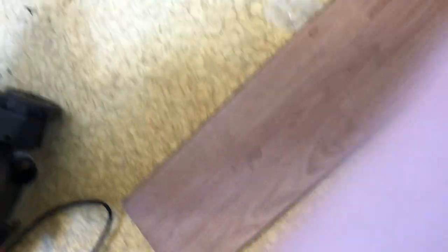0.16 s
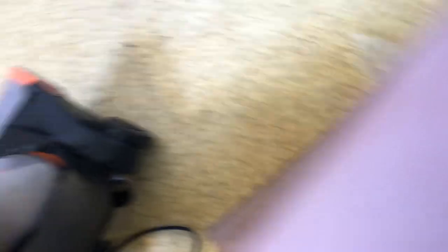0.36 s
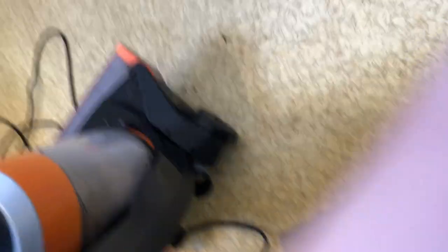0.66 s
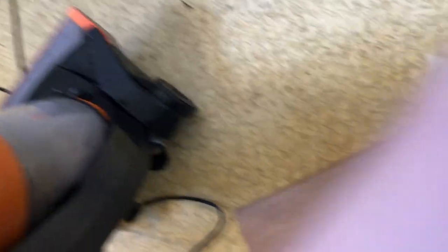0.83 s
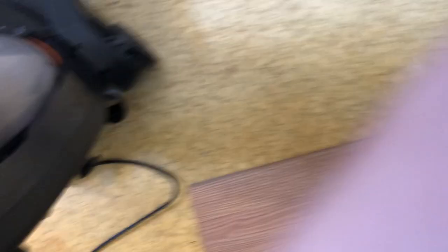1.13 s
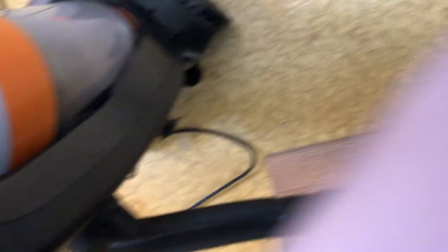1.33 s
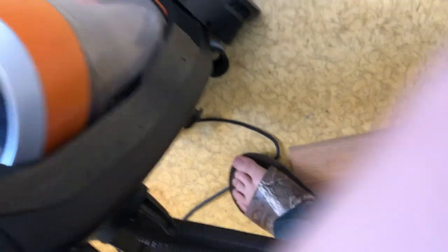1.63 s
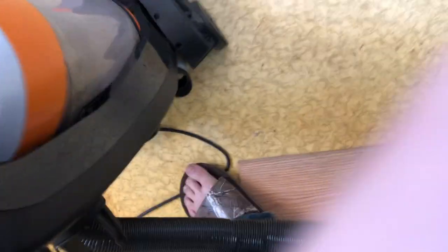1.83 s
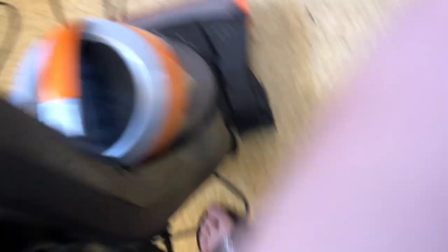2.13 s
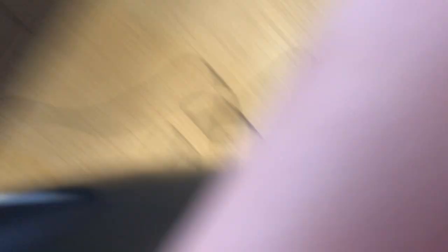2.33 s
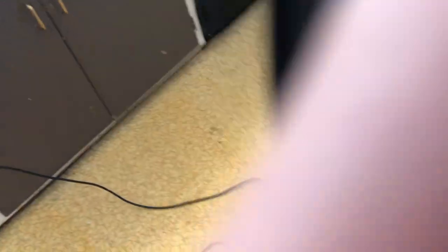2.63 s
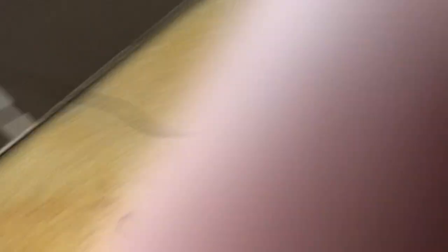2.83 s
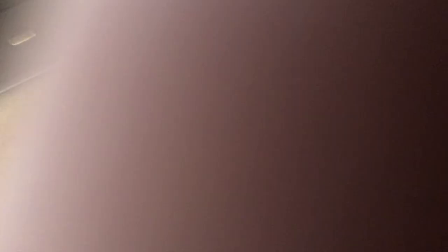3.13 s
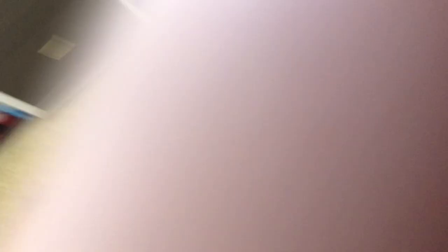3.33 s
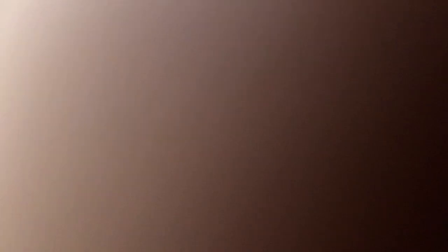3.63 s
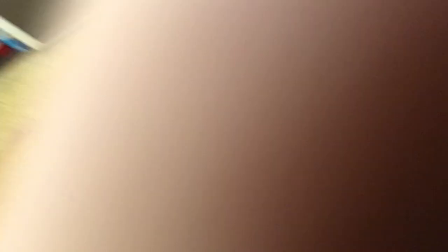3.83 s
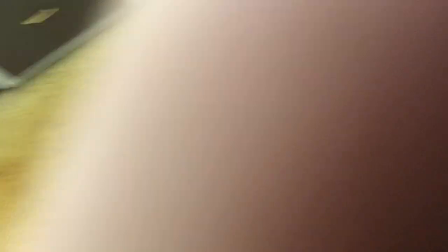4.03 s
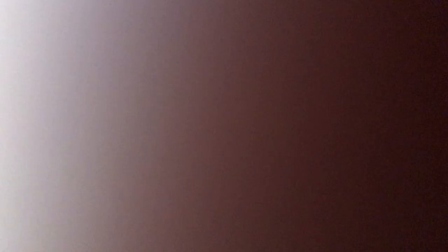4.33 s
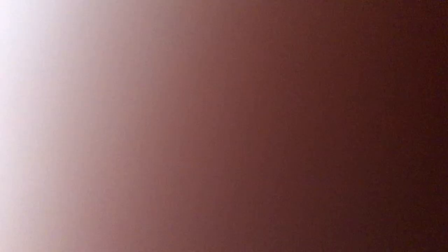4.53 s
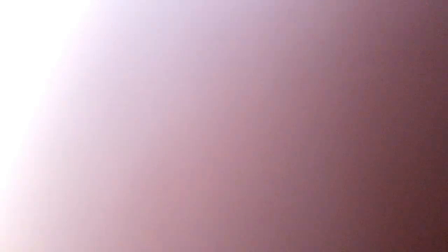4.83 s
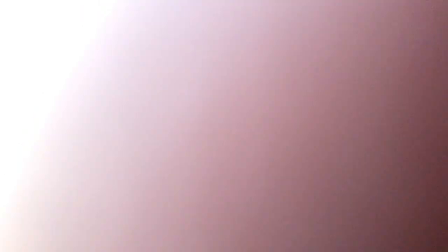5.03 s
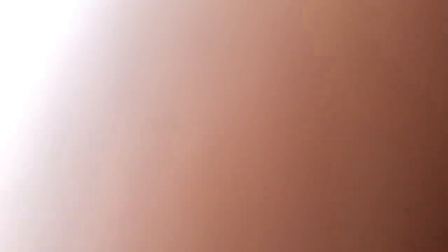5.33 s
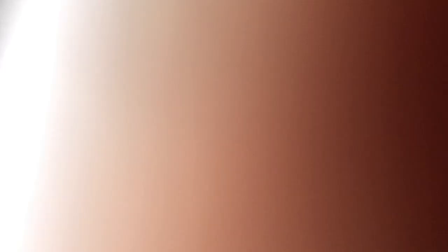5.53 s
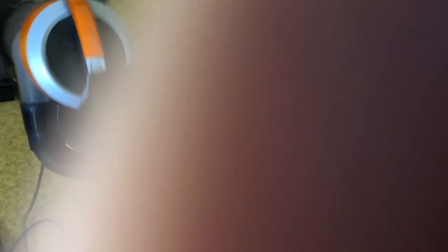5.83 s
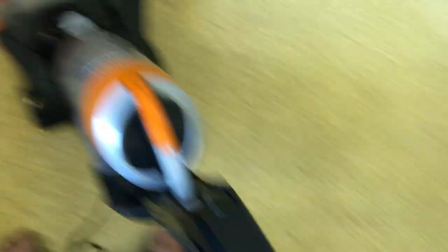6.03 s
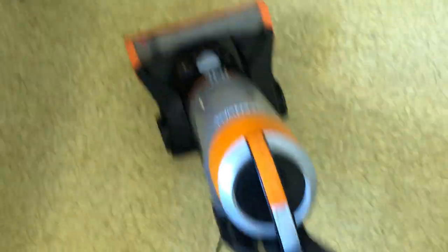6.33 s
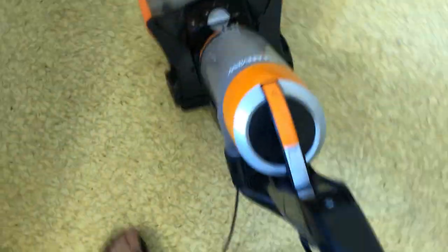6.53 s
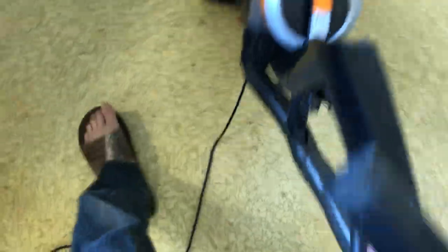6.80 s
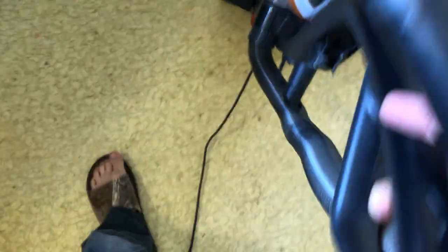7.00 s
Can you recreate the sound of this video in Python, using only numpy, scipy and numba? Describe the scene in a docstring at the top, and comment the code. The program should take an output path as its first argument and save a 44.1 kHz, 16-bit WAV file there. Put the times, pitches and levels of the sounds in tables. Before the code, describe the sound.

An upright vacuum cleaner runs over carpet with a steady motor hum, high whine and rushing air, turning hissier midway.

```python
"""An upright vacuum cleaner is pushed over carpet, heard from a phone carried by the person steering it.
From the start air roars through the body, the motor shaft hums, its fan whines
and the brush roll beats against the mains hum. Grit ticks inside near 1 s and 2 s; a short rumble passes.
Midway the phone swings round and a sharper air hiss comes forward, peaking near 5.8 s and then fading."""
import sys
import numpy as np
from scipy import signal
from scipy.fft import rfft, irfft, next_fast_len
from scipy.io import wavfile
from scipy.ndimage import uniform_filter1d
from numba import njit

SR = 44100
rng = np.random.default_rng(int(sys.argv[2]) if len(sys.argv) > 2 else 0)


def dump_mix(stems):
    """Bounce the given channels to the path in sys.argv[1] as a 16-bit WAV at rate SR."""
    frames = np.atleast_2d(stems).T  # one column per channel
    limited = np.clip(frames, -1, 1)  # hard clip at full scale
    pcm = np.round(limited * 32767).astype(np.int16)
    wavfile.write(sys.argv[1], SR, pcm)


N = 315756
TIME = np.arange(N) / SR
MAINS_HZ, TOP_HZ = 60, 15750


def undb(db):
    return 10 ** (np.asarray(db) / 20)


def unit(x):
    """Scale to rms 1."""
    return x / np.sqrt(np.mean(x ** 2))


def curves(table):
    """Table columns, interpolated linearly in time."""
    time_s, *columns = np.transpose(table)
    return [np.interp(TIME, time_s, column) for column in columns]


def drift(rate_hz):
    """Smooth random drift, spread near 1."""
    hold = max(int(SR / rate_hz), 2)
    steps = np.repeat(rng.standard_normal(N // hold + 2), hold)
    steps = steps[rng.integers(hold):][:N]
    return 1.47 * uniform_filter1d(uniform_filter1d(steps, hold), hold)


@njit
def bandpass(x, centre_hz, width_hz):
    """State-variable band-pass, unity gain at its moving centre."""
    y, band, low = np.empty(len(x)), 0., 0.
    for i in range(len(x)):
        g, damping = np.tan(np.pi * centre_hz[i] / SR), width_hz / centre_hz[i]
        v = (band + g * (x[i] - low)) / (1 + g * (g + damping))
        band, low, y[i] = 2 * v - band, low + 2 * g * v, damping * v
    return y


def resonate(x, centre_hz, width_hz):
    """Steep-skirted resonance, equally wide at any centre."""
    centre_hz = np.minimum(centre_hz * np.ones(N), .44 * SR)
    angle = 2 * np.pi * centre_hz.mean() / SR
    warped_hz = float(width_hz * angle / np.sin(angle))
    return bandpass(bandpass(x, centre_hz, warped_hz), centre_hz, warped_hz)


def noise_band(centre_hz, width_hz):
    return resonate(rng.standard_normal(N), centre_hz, width_hz)


def turbulence(colour, flicker_db, flicker_hz, ripple_db=1.1):
    """Coloured air noise, rippled by room reflections; each octave flickers on its own."""
    size = next_fast_len(N)
    bin_hz = np.maximum(np.fft.rfftfreq(size, 1 / SR), 1)
    freq_hz, density_db = np.transpose(colour)
    colour_db = np.interp(np.log(bin_hz), np.log(freq_hz), density_db)
    knots_hz = np.arange(0, SR / 2, 20)
    room_db = ripple_db * np.interp(bin_hz, knots_hz, rng.standard_normal(len(knots_hz)))
    spectrum = rfft(rng.standard_normal(size)) * undb(colour_db + room_db)
    octave = np.clip(np.log2(bin_hz / 60), 0, 8)
    bands = (irfft(spectrum * np.maximum(1 - abs(octave - k), 0), size)[:N] for k in range(9))
    return unit(sum(band * undb(flicker_db * drift(flicker_hz)) for band in bands))


def tone(cycles, scatter, fade_hz):
    """Sine of rms 1; its reflections add and cancel as the machine moves."""
    paths = 1 + scatter * (drift(fade_hz) + 1j * drift(fade_hz))
    return unit(np.imag(paths * np.exp(2j * np.pi * cycles)))


# Grit impacts: start_s, level_db, centre_hz, width_hz, t60_s
GRIT_HITS = [(1.156, -26, 14300, 3500, .013), (2.252, -16, 4200, 5000, .016),
             (2.252, -24, 12000, 6000, .007), (2.255, -26, 10800, 2500, .01)]

def grit(dust_per_s=150):
    """Hard crumbs click in the plastic duct over a faint patter of dust."""
    clicks = 0
    for start_s, level_db, centre_hz, width_hz, t60_s in GRIT_HITS:
        decay = (TIME >= start_s) * undb(-60 * np.maximum(TIME - start_s, 0) / t60_s)
        clicks += undb(level_db) * decay * unit(noise_band(centre_hz, width_hz))
    dust = (rng.random(N) < dust_per_s / SR) * rng.standard_normal(N)
    return clicks + undb(-57) * unit(resonate(dust, centre_hz=4000, width_hz=7000))


# Air surges: peak_s, level_db, centre_hz, width_hz, half_length_s
AIR_SURGES = [(2.15, -42, 240, 200, 1), (3.6, -38, 10000, 5000, 0.08), (3.56, -27.5, 5800, 1100, 0.07),
              (4.012, -31, 4300, 1400, 0.11), (4.16, -44, 12000, 2500, .04), (4.38, -42, 13400, 2400, .16),
              (4.557, -35.5, 4600, 550, .12), (5.0, -37, 4720, 400, .25), (2.28, -37, 5000, 6000, .035),
              (5.9, -42, 9000, 6000, .04), (5.83, -36, 8000, 2500, 0.098), (5.743, -21.5, 640, 740, 0.026),
              (5.74, -26, 3600, 3000, .02), (5.762, -31.5, 195, 170, 0.056),
              (5.86, -24.5, 5350, 1300, 0.087), (6.546, -33, 630, 180, 0.1)]

def surges():
    """Swells of rushing air and rumble, each in its own band."""
    sound = 0
    for peak_s, level_db, centre_hz, width_hz, half_length_s in AIR_SURGES:
        swell = np.exp(-((TIME - peak_s) / half_length_s) ** 2)
        sound += undb(level_db) * swell * unit(noise_band(centre_hz, width_hz))
    return sound


# Brush contact with the carpet: time_s, level_db
BRUSH_CONTACT = [(0, -32.5), (.32, -30.5), (.95, -35), (1.2, -42), (1.5, -40), (1.62, -53), (2.27, -49),
                 (2.41, -37), (2.56, -42), (3.0, -44), (3.52, -37), (3.9, -46.5), (4.6, -39), (6.22, -44),
                 (6.38, -37.5), (7.16, -38.5)]
# Brush overtones: beat_multiple, level_db
BRUSH_OVERTONES = [(2, -51), (3, -47.5)]

def brush_roll(turns, beats_per_turn=.229):
    """Bristle rows slap the carpet a little slower than the mains buzz, so the two throb."""
    beats = beats_per_turn * turns
    slap = tone(beats, scatter=.21, fade_hz=11)
    buzz = tone(2 * MAINS_HZ * TIME, scatter=.088, fade_hz=2.77)
    contact = undb(curves(BRUSH_CONTACT)[0] - 3.5)  # pressed down, the nozzle radiates both more
    overtones = sum(undb(level_db) * tone(multiple * beats, scatter=.7, fade_hz=8)
                    for multiple, level_db in BRUSH_OVERTONES)
    return contact * (slap + .4 * buzz) + undb(-58) * buzz + overtones


# Air jet: time_s, level_db, shift_octaves
JET_PATH = [(2.8, -45, -.1), (3.0, -35.5, -.12), (3.36, -34.5, 0), (3.47, -26, 0.00012), (3.7, -29.5, .13),
            (3.85, -28.5, .1), (4.0, -30, -.08), (4.2, -33.5, -0.072), (4.5, -29.5, .02),
            (5.55, -27.5, -0.016), (5.79, -21, -0.073), (5.91, -22, 0.012), (6.1, -36, -0.27),
            (6.25, -60, -.2)]
# Jet resonances: centre_hz, width_hz, gain_db
JET_MODES = [(3520, 560, -3.5), (4590, 750, -2), (5760, 1300, -1), (6980, 1400, -3.5), (8700, 1200, -18)]

def jet_hiss():
    """An air jet; its resonances slide as its angle to the microphone changes."""
    level_db, shift_octaves = curves(JET_PATH)
    jet = sum(undb(gain_db) * noise_band(centre_hz * 2 ** shift_octaves, width_hz)
              for centre_hz, width_hz, gain_db in JET_MODES)
    flutter_db = .6 * drift(rate_hz=60)
    return unit(jet) * undb(level_db + flutter_db)


# Airflow, relative levels: time_s, body_db, duct_db, exhaust_db
AIR_LEVELS = [(0, -35.5, -34, -44), (.7, -36.5, -34.5, -45), (1.8, -36, -35, -45.5),
              (2.05, -37.5, -37, -44.5), (2.8, -34.5, -34, -47), (3.2, -36, -38.5, -48.5),
              (3.6, -32.5, -35, -47), (3.9, -33, -36, -46), (4.25, -31.5, -36, -42.5),
              (4.7, -28.5, -32.5, -43), (5.5, -30.5, -32, -43), (5.76, -27.5, -30.5, -42.5),
              (6.03, -32, -38, -42), (6.27, -33, -30.5, -45), (6.48, -30, -36, -42.5),
              (7.16, -33.5, -34.5, -41)]
# Air spectra: freq_hz, density_db
BODY_COLOUR = [(25, -43), (70, -28.5), (130, -14), (175, -6.5), (250, -9.5), (340, -4.5), (450, -1.5),
               (550, 0), (630, 3), (800, -3), (1100, -9), (2500, -43)]
DUCT_COLOUR = [(300, -30.5), (700, -10), (1000, 0.5), (1300, -1), (1850, -4.5), (2600, -9), (6000, -41)]
EXHAUST_COLOUR = [(500, -21), (1500, -4), (2100, 6.5), (2700, 9.5), (3500, 14), (4800, 14.5), (6000, 11),
                  (7500, 7), (9000, 3), (11000, -1), (13000, -2), (15700, -3)]

def airflow():
    """Air roars in the body, blows through the duct and rushes from the exhaust."""
    body_db, duct_db, exhaust_db = curves(AIR_LEVELS)
    body = undb(body_db + 2.5) * turbulence(BODY_COLOUR, flicker_db=.45, flicker_hz=18)
    duct = undb(duct_db + 1.5) * turbulence(DUCT_COLOUR, flicker_db=.9, flicker_hz=22)
    exhaust = undb(exhaust_db + 14) * turbulence(EXHAUST_COLOUR, flicker_db=1, flicker_hz=18)
    return body + duct + exhaust


# Reflection off the arm: time_s, gain, delay_ms
ARM_ECHO = [(2.7, 0, .45), (3.55, .28, .5), (3.8, .25, .53), (4.3, .38, .64), (5.4, .34, .625),
            (6.1, 0, .62)]

def arm_reflection(air, cutoff_hz=4300):
    """A dull echo off the arm by the microphone cuts a notch that slides as the gap changes."""
    gain, delay_ms = curves(ARM_ECHO)
    dull = signal.sosfilt(signal.butter(2, cutoff_hz, fs=SR, output="sos"), air)
    return air + gain * np.interp(TIME - delay_ms / 1000, TIME, dull)


# Whine as the fan turns to and from the microphone: time_s, low_tone_db, high_tone_db
WHINE_LEVELS = [(0, -46, -38.5), (.4, -38, -35.5), (.72, -41, -36), (.97, -43, -31.5), (1.15, -48, -39),
                (1.42, -47, -35), (1.7, -44, -38.5), (2.25, -45, -38), (2.55, -41, -39),
                (3.35, -41.5, -35.5), (3.75, -44, -41.5), (4.6, -42, -43), (5.4, -39, -40), (6.0, -50, -45),
                (6.22, -39, -38), (6.6, -38, -36.5), (6.97, -40, -36), (7.16, -46, -40)]

def fan_whine(turns, swell_db=2, crest_s=.92, period_s=.478):
    """Two fluttering blade tones; the upper crests as the machine crosses standing waves."""
    low_db, high_db = curves(WHINE_LEVELS)
    swell = np.cos(2 * np.pi * (TIME - crest_s) / period_s)
    high = undb(high_db + swell_db * swell) * tone(9 * turns, scatter=.6, fade_hz=16)
    low = undb(low_db) * tone(7 * turns, scatter=.6, fade_hz=16)
    return high + low


# Shaft hum through the room's standing waves: time_s, level_db
HUM_LEVEL = [(0, -38), (.27, -30.5), (.53, -21), (.78, -17), (1.3, -16.5), (2.25, -14), (2.4, -16),
             (2.57, -24.5), (3.1, -20.5), (3.9, -22), (4.35, -20.5), (5.14, -24.5), (5.33, -18.5),
             (5.62, -14.8), (6.6, -21.7), (6.98, -17.5), (7.16, -22.5)]
# Weak motor partials: shaft_multiple, level_db
MOTOR_PARTIALS = [(.876, -44.5), (1.228, -43.5), (1.765, -49), (2.245, -44.5), (2.6, -48), (3, -45),
                  (12, -53), (18, -58), (24, -64)]
# Lesser tones at the microphone: time_s, partials_gain_db, octave_db, mains_db
LESSER_TONES = [(0, 2, -50, -53), (1.8, 3, -49, -58), (2.6, -0.5, -43.5, -61), (4.2, -1.5, -44.5, -70),
                (5.0, -2.5, -43, -65), (6.2, -1, -41, -64), (6.9, 1, -43, -63)]

def motor(turns):
    """The unbalanced shaft hums and its fan whines; weak partials waver over mains hum."""
    partials_gain_db, octave_db, mains_db = curves(LESSER_TONES)
    hum = undb(curves(HUM_LEVEL)[0]) * tone(turns, scatter=.0226, fade_hz=26)
    room_echo = undb(-40.5) * drift(rate_hz=12) * np.sin(2 * np.pi * turns)
    octave = undb(octave_db) * tone(2 * turns, scatter=.83, fade_hz=6)
    partials = sum(undb(level_db) * tone(multiple * turns, scatter=.35, fade_hz=9.7)
                   for multiple, level_db in MOTOR_PARTIALS)
    mains = undb(mains_db) * tone(MAINS_HZ * TIME, scatter=.15, fade_hz=2)
    return hum + room_echo + octave + fan_whine(turns) + undb(partials_gain_db) * partials + mains


# Motor shaft: time_s, speed_hz
SHAFT_SPEED = [(0, 490.9), (2.5, 491.1), (3.1, 492.5), (3.8, 493.0), (4.3, 491.9), (5.1, 491.6),
               (5.5, 493.0), (6.2, 492.6), (6.4, 494.0), (7.16, 492.5)]

def scene():
    """One shaft drives motor tones and brush, amid air and grit; both channels alike."""
    speed_hz = curves(SHAFT_SPEED)[0] + .19 * drift(rate_hz=12)
    turns = np.cumsum(speed_hz) / SR
    sound = motor(turns) + brush_roll(turns) + arm_reflection(airflow() + jet_hiss()) + grit() + surges()
    return np.array([sound, sound])


def record(dry):
    """Steep low-pass at TOP_HZ."""
    return signal.sosfilt(signal.ellip(12, .1, 80, TOP_HZ, fs=SR, output="sos"), dry)


dry = scene()
out = record(dry)
dump_mix(out)
```